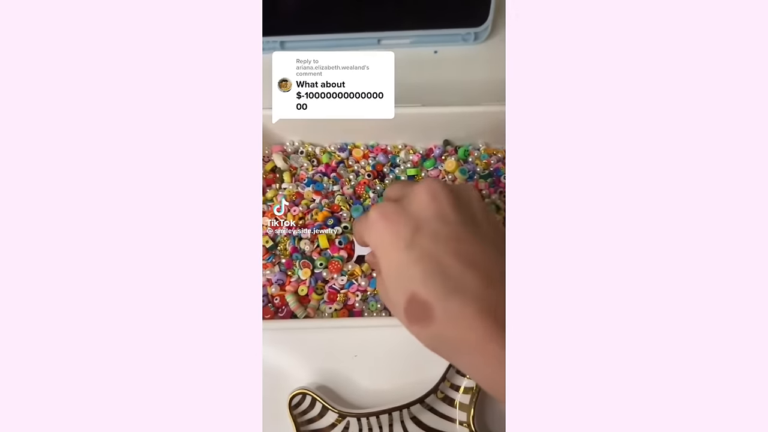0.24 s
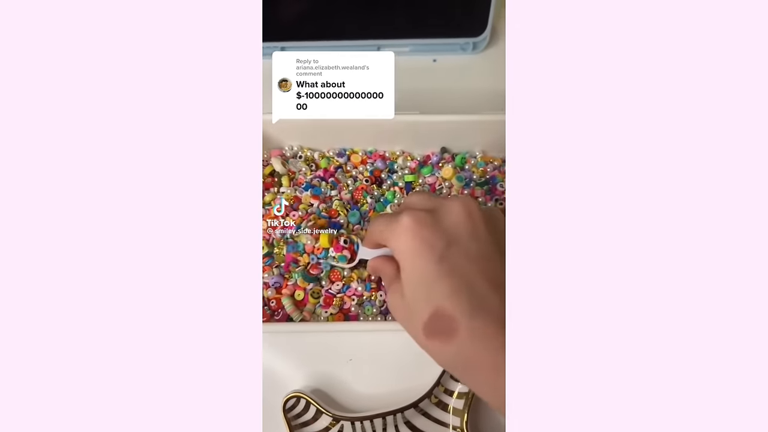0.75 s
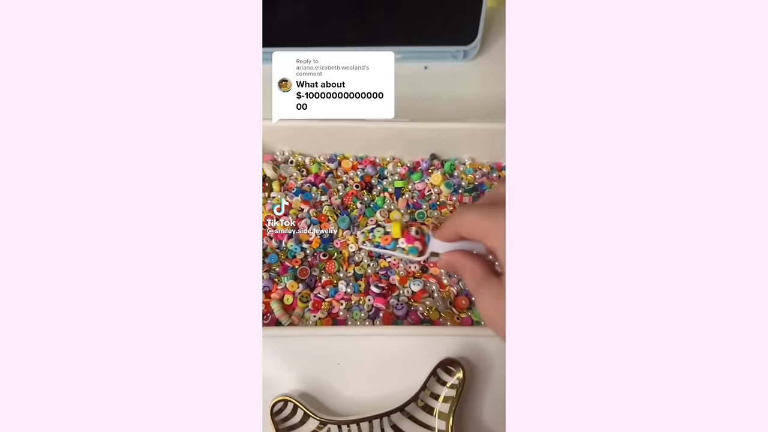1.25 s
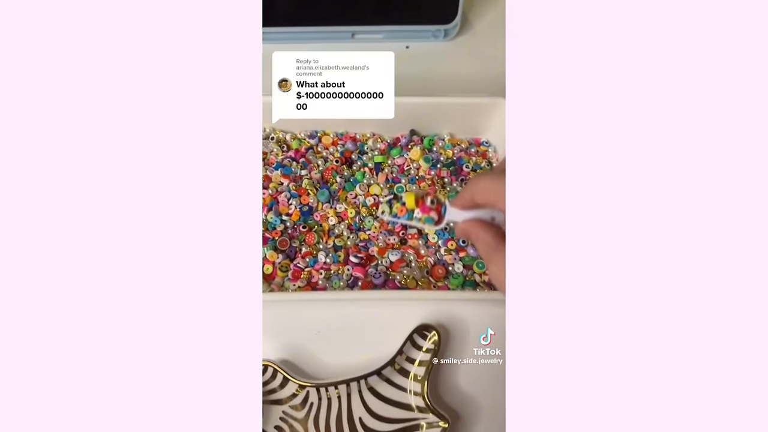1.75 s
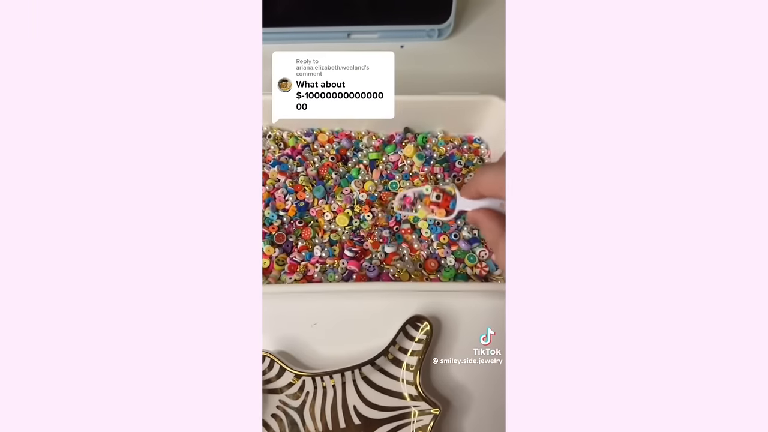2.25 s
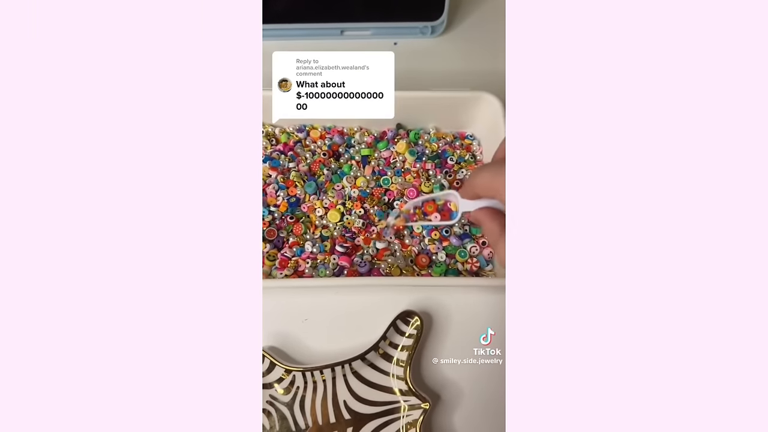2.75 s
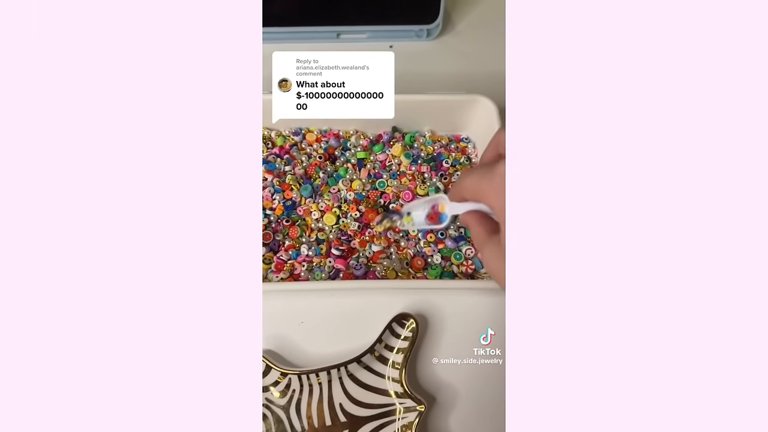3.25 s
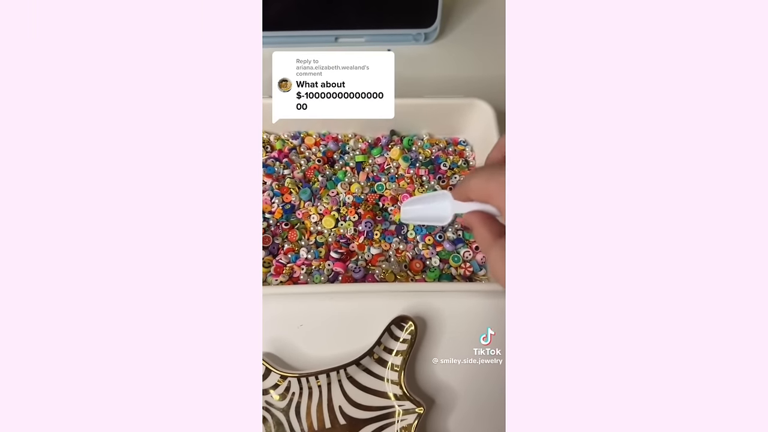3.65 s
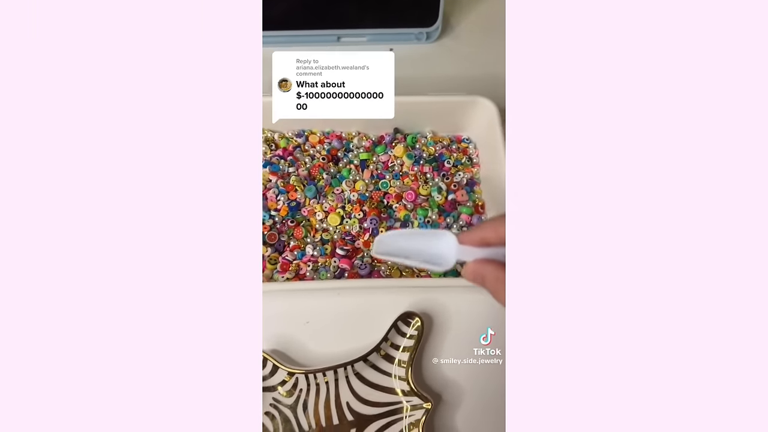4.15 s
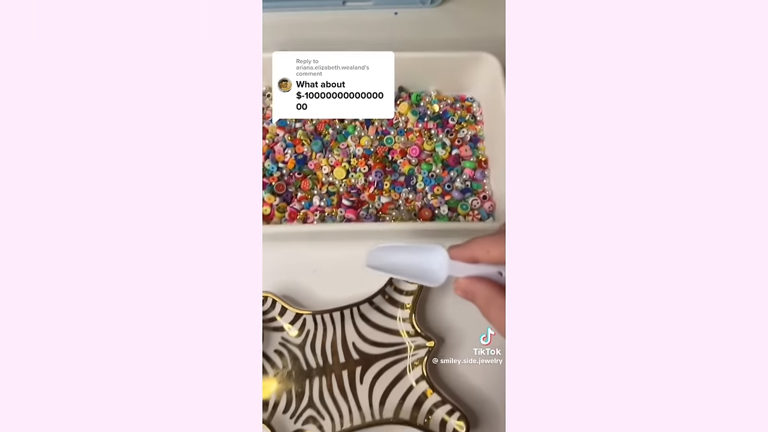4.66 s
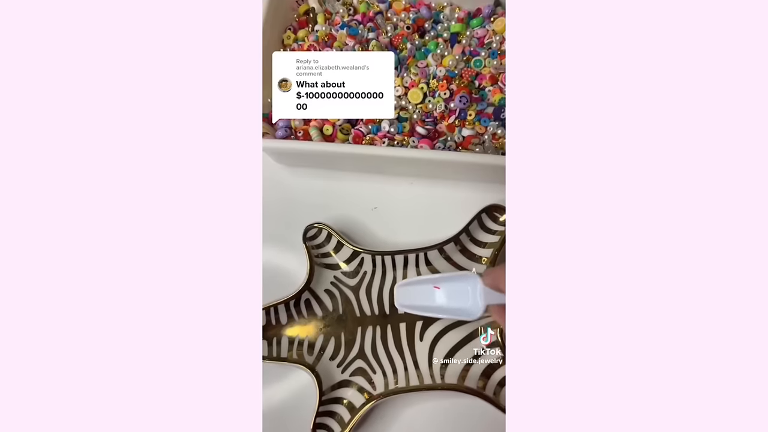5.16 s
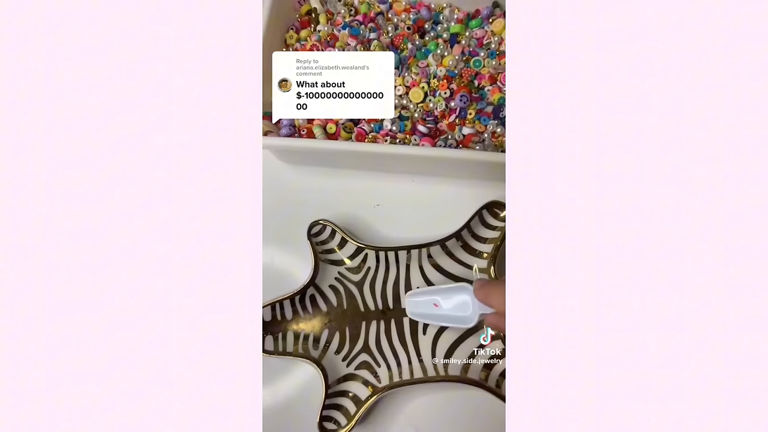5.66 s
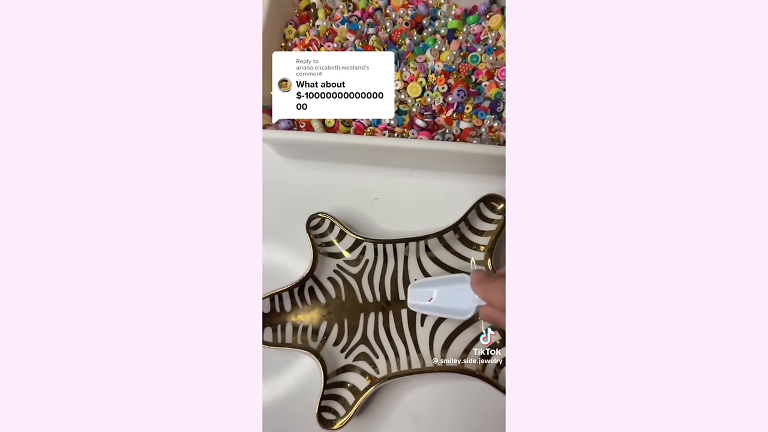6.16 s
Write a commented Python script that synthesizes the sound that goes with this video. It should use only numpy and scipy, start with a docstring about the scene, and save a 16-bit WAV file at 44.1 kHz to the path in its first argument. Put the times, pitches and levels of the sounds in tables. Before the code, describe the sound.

From the start, a small plastic scoop digs through a tray of clay beads, making a dense rustling rattle with sharp clicks on top. It thins out after about 1.2 seconds and briefly stops. From 1.7 seconds the beads are shaken in the scoop, clattering louder and peaking near 2.5 seconds. From about 2.9 to 3.6 seconds they spill back into the tray with bright ticks. A lull follows, holding only low ventilation rumble, faint hums and hiss, cut by an instant of dead silence at 5 seconds. The background returns quieter. At 5.6 and 6 seconds, two beads drop singly onto a glazed dish, the loudest sounds, each a sharp crack with a short high ring and a soft bump through the table. Everything is close to the microphone in a small room.

```python
"""Clay beads clatter as a small plastic scoop digs through a tray of them, is shaken and tipped out.
Each collision is a snap of noise coloured by clay and plastic; loud clicks ride on a dense rattle.
After a lull and an instant of dead silence, two beads drop on a glazed dish: a crack, a ring and
a bump on the table. All is close, in a small room with low ventilation rumble, faint tones and hiss."""
import sys
import numpy as np
from scipy import signal
from scipy.io import wavfile
from scipy.ndimage import uniform_filter1d

SR = 44100
rng = np.random.default_rng(int(sys.argv[2]) if len(sys.argv) > 2 else 0)


def materialize(psi):
    """Save the field psi as 16-bit PCM at rate SR to the path in sys.argv[1].

    A 1-D psi becomes a single channel; in a 2-D psi each row is a channel.
    """
    bounded = np.clip(np.atleast_2d(psi).T, -1, 1)
    quanta = np.round(bounded * 32767).astype(np.int16)
    wavfile.write(sys.argv[1], SR, quanta)


N = 282240

# the scoop's stirring gesture: time_s, level_db, brightness_db
STIRRING = [(0, -39.5, 0.5), (.1, -44, 0.5), (.28, -51.5, 0), (.32, -61, 4), (.39, -66, 0),
            (.43, -58.5, -1), (.5, -59.5, 1), (.55, -57, 3), (.74, -43, 2.5), (.92, -53, -0.5),
            (1.0, -67, -9), (1.25, -77, -5), (1.45, -98, -13), (1.7, -88, -12), (1.82, -63.5, 9),
            (1.95, -46.5, 9), (2.078, -43, -2), (2.22, -54.5, -0.5), (2.35, -63, 3), (2.47, -41, 4),
            (2.62, -45.5, -4), (2.72, -56.5, -3.5), (2.9, -60, -5), (3.04, -70.5, -3.5),
            (3.14, -48.5, -1.5), (3.228, -57, 0.5), (3.33, -48.5, -4), (3.47, -57.5, -6), (3.54, -70, -10),
            (3.65, -87, -6)]
STAGE_CHANGES_S = (1.55, 2.93)  # the scoop leaves the heap, then tips
SILENCE_START_S, SILENCE_END_S = 4.959, 5.1035


def gain_of(db):
    return 10 ** (np.asarray(db) / 20)


def unit_rms(x):
    return x / np.sqrt(np.mean(x ** 2) + 1e-20)


def curve_at(points, hz):
    """Interpolate (frequency, value) points on a log-frequency axis."""
    point_hz, value = np.transpose(points)
    return np.interp(np.log(hz + 1), np.log(point_hz + 1), value)


def add(mix, start_s, sound):
    part = mix[round(start_s * SR):][:len(sound)]
    part += sound[:len(part)]


def ring(modes, length):
    """A struck body: one dying sine for each (pitch_hz, level_db, t60_s)."""
    hz, db, t60 = np.transpose(modes)[:, :, None]
    t = np.arange(length) / SR
    return (gain_of(db - 60 * t / t60) * np.sin(2 * np.pi * hz * t)).sum(0)


def minimum_phase(gain):
    """Impulse response with this spectrum that rings after the blow, never before."""
    log_gain = np.log(gain + 1e-4)
    mirrored = np.r_[log_gain, log_gain[-2:0:-1]]
    return np.fft.ifft(np.exp(np.conj(signal.hilbert(mirrored)))).real


def drifting_noise(colour_db, patchy_db):
    """Coloured noise with patches of its spectrum swelling and fading."""
    real, imag, patches = rng.standard_normal((N // 1024 + 5, 2049, 3)).T
    patches = unit_rms(uniform_filter1d(uniform_filter1d(patches, 10, 0), 4, 1))
    spectra = (real + 1j * imag) * gain_of(colour_db[:, None] + patchy_db * patches)
    return unit_rms(signal.istft(spectra, nperseg=4096, noverlap=3072)[1][:N])


def room(x):
    """Reverb of a small room: sparse reflections whose treble dies first."""
    # decay of the room: freq_hz, t60_s
    decay = [(1000, 0.35), (3000, 0.13), (7000, 0.1), (13000, 0.12), (15500, 0.091)]
    taps = np.zeros(SR // 3)
    slots = np.arange(300, len(taps) - 20, 20)
    taps[slots + rng.integers(0, 20, len(slots))] = rng.choice([-1., 1.], len(slots))
    hz, t, spectra = signal.stft(taps, SR, nperseg=256)
    tail = signal.istft(spectra * gain_of(-60 * t / curve_at(decay, hz)[:, None]), SR, nperseg=256)[1]
    return signal.fftconvolve(x, tail / np.linalg.norm(tail))[:N]


def ventilation():
    """Rumbling air with soft hums: swells slightly at first, then quieter and thinner after the silent gap."""
    # spectrum of the air before and after the silent gap: freq_hz, level_db
    colour_before_gap = [(22, -31), (38, -2.5), (54, -0.5), (75, -16), (109, -0.5), (207, -11), (237, -20),
                         (306, -11), (357, -16.5), (394, -13.5), (548, -18), (679, -9.5), (1110, -18),
                         (2100, -30.5), (4000, -46.5), (5200, -74.5), (8800, -120)]
    colour_after_gap = [(22, -31), (38, -7.5), (107, -7.5), (164, -17), (219, -10.5), (247, -22), (409, -15.5),
                        (478, -25.5), (616, -12), (910, -16.5), (1290, -18), (2320, -31.5), (4000, -52),
                        (5200, -82.5), (8800, -120)]
    # hums of the room: pitch_hz, width_hz, boost_db
    hums = [(53.57, 20, 7.5), (100.8, 9.8, 6), (109.3, 2.2, 7.5), (146, 9.2, -1.5), (850, 15, 4),
            (1113, 11, 9.5)]
    hz, t = np.fft.rfftfreq(4096, 1 / SR), np.arange(N) / SR
    hums_db = sum(db / (1 + (2 * (hz - pitch) / width) ** 2) for pitch, width, db in hums)
    air_before_gap = drifting_noise(curve_at(colour_before_gap, hz) + hums_db, patchy_db=1.4)
    air_after_gap = drifting_noise(curve_at(colour_after_gap, hz) + hums_db, patchy_db=1.4)
    swell = gain_of(np.interp(t, (0, SILENCE_START_S), (-52, -50.5)))
    return np.where(t < SILENCE_START_S, swell * air_before_gap, gain_of(-58) * air_after_gap)


def faint_tones():
    """Thin low sines fade in and out during the lull."""
    # background tones: start_s, end_s, pitch_hz, level_db
    tones = [(3.55, 4.0, 318.5, -64), (4.199, 4.454, 401, -61.5), (4.32, 4.727, 306.4, -58.5),
             (4.743, 4.916, 105.2, -47.5)]
    out = np.zeros(N)
    for start, end, hz, db in tones:
        t = np.arange(0, end - start, 1 / SR)
        add(out, start, gain_of(db) * np.sin(2 * np.pi * hz * t) * signal.windows.tukey(len(t), .4))
    return out


def dish_drops():
    """Beads hit the dish. Returns the blows (crack and table bump) and the ring of the glaze."""
    # beads landing: start_s, crack_db, thud_db
    drops = [(5.6188, -9, -24.5), (6.0412, -7.5, -24)]
    # modes of the dish: pitch_hz, first_bead_db, second_bead_db, t60_s
    dish_modes = [(2290, -30, -29, .035), (2455, -55, -50, .2), (2833, -29, -22, .15),
                  (2835, -54, -44, .33), (2886, -50, -46, .12), (3171, -62, -56, .2),
                  (3635, -35, -40, .025), (3640, -52, -58, .12), (4323, -51, -45, .1),
                  (4484, -26.5, -25.5, .13), (4486, -48, -46, .32), (4665, -46, -46, .07),
                  (6227, -41, -44, .1), (6515, -42, -46, .04), (6750, -60, -52, .15), (8090, -60, -50, .12),
                  (8866, -56, -62, .12), (10700, -60, -56, .12), (12150, -60, -52, .14),
                  (12352, -51, -48, .167), (12790, -56, -57, .19), (13030, -56, -51, .17),
                  (13155, -36, -34, .15), (13225, -46, -43, .12), (13540, -47, -49, .11),
                  (14100, -48, -50, .16)]
    # spectrum of clay striking glaze: freq_hz, level_db
    crack_colour = [(470, -49), (800, -14.5), (1400, -18), (2000, -15.5), (2350, 5), (3500, 1.5),
                    (4770, -4), (5620, -15), (6300, -4.5), (6890, 3.5), (8430, -0.5), (9690, -16),
                    (10500, -6.5), (13100, 1), (15500, -18), (16500, -35.5)]
    # modes of the table under the dish: pitch_hz, level_db, t60_s
    table_modes = [(325, -6, .045), (385, -.5, .055), (480, -2.5, .045), (580, -7, .03)]
    hz, t = np.fft.rfftfreq(512, 1 / SR), np.arange(512) / SR
    crack_body = minimum_phase(gain_of(curve_at(crack_colour, hz)))
    soft_attack = 1 - np.exp(-(np.arange(6000) / SR / 0.0087) ** 2)  # the table answers a little late
    thud = ring(table_modes, 6000) * soft_attack
    blows, glaze = np.zeros(N), np.zeros(N)
    for bead, (start, crack_db, thud_db) in enumerate(drops):
        modes = [(pitch, levels_db[bead], t60) for pitch, *levels_db, t60 in dish_modes]
        add(glaze, start, ring(modes, 16000))
        chatter = gain_of(-17.5) * rng.standard_normal(512) * gain_of(-60 * t / 0.022)
        chatter[12] += 1  # one hard contact
        crack = signal.fftconvolve(chatter, crack_body)
        add(blows, start, gain_of(crack_db) * crack / abs(crack).max())
        add(blows, start, gain_of(thud_db) * thud)
    return blows, glaze


def stirring_db(times_s):
    """Knock, clack and tick levels of the rattle; brightness lifts the ticks and lowers the knocks."""
    at, level_db, brightness_db = np.transpose(STIRRING)
    tilt_db = np.outer((-0.37, 0, .9), np.interp(times_s, at, brightness_db))
    balance_db = np.c_[[-6, -1.5, -3]]
    return np.interp(times_s, at, level_db) + tilt_db + balance_db


def collision(stage, band):
    """One bead contact in one band (knock, clack or tick): a dry snap through clay and plastic."""
    # spectra of beads packed in the tray, shaken in the scoop and tipped back: freq_hz, level_db
    heap = [(530, -29), (900, -16.5), (1340, -2.5), (1750, -12), (2070, -4), (2570, -1), (2830, -10),
            (3110, -3.5), (3430, -7), (5100, -3), (5890, -8.5), (8980, 0), (10200, -4), (13500, 5.5),
            (16000, -5)]
    scoop = [(530, -41), (900, -15.5), (1170, -9.5), (1420, -14.5), (1700, -5.5), (2140, -11.5), (2360, -3),
             (2690, -2), (3300, -9.5), (7060, -20), (8660, -11.5), (10100, -19), (12900, -6), (15400, -14),
             (16000, -25)]
    spill = [(530, -47.5), (900, -16), (1170, -10), (2120, -13.5), (2690, -8.5), (3230, -16.5),
             (4740, -9.5), (5820, -18), (6560, -7), (7310, -18), (8660, -4), (9770, -16.5), (12300, -4.5),
             (15400, -12.5), (16000, -22.5)]
    # plastic and clay resonances, weighted anew at each contact: pitch_hz, boost_db, half_width_hz
    resonances = [(1210, 2.5, 240), (1260, -1, 120), (1902, 5, 84), (2430, 5, 33), (2730, 4, 180),
                  (3150, 2.5, 99), (3770, 4, 130), (4640, 1.5, 750), (6930, 4.5, 160), (7800, 6, 170),
                  (9040, 4, 130), (10650, 6.5, 110), (12500, -2.5, 90), (12800, 5.5, 200)]
    ringing = (0.67, 0.94, 1.6)[stage]  # how freely the beads ring in heap, scoop and spill
    low_hz, high_hz = ((600, 4000), (4000, 10000), (10000, 17000))[band]
    hz, t = np.fft.rfftfreq(1024, 1 / SR), np.arange(1024) / SR
    weights = ringing * (1 + .5 * rng.standard_normal(len(resonances)))
    peaks_db = sum(weight * db / (1 + ((hz - pitch) / width) ** 2)
                   for weight, (pitch, db, width) in zip(weights, resonances))
    passband = 1 / (1 + (low_hz / (hz + 1)) ** 12) / (1 + (hz / high_hz) ** 12)
    body = minimum_phase(gain_of(curve_at((heap, scoop, spill)[stage], hz) + peaks_db) * passband)
    snap_t60 = (.008, .006, .005)[band] * gain_of(1.5 * rng.standard_normal())
    settling = gain_of((-13.5, -12.5, -20.5)[band] - 60 * t / 0.11)  # neighbours shift after the blow
    envelope = (gain_of(-60 * t / snap_t60) + settling) * (1 - np.exp(-t / 0.00013))
    snap = rng.standard_normal(1024) * envelope
    snap[6] += gain_of(8.5) * rng.choice([-1, 1])  # the hard first touch
    sound = signal.fftconvolve(snap, body)[:1024] * gain_of(-60 * t / 0.16)
    return sound / np.sqrt(uniform_filter1d(sound ** 2, size=66).max())  # loudest 1.5 ms at unit level


def bead_rattle(per_s=1400, spread_db=2.5, clump_s=.02, clump_db=2.5, variants=9):
    """A bed of small random collisions that come in clumps, each sounding in all three bands."""
    hits = gain_of(spread_db * np.minimum(rng.exponential(1, N), 4))
    hits *= rng.random(N) < per_s / SR
    clumps = unit_rms(uniform_filter1d(rng.standard_normal(N), round(clump_s * SR)))
    hits = unit_rms(hits * gain_of(clump_db * clumps))
    out, t = np.zeros(N), np.arange(N) / SR
    grain_index = rng.integers(0, variants, N) + variants * np.searchsorted(STAGE_CHANGES_S, t)
    for band, level in enumerate(gain_of(stirring_db(t))):
        train = hits * level
        for k in range(3 * variants):
            grain = collision(stage=k // variants, band=band)
            out += signal.oaconvolve(train * (grain_index == k), grain / np.linalg.norm(grain))[:N]
    return out


def bead_clicks(strays_per_s=85, stray_lift_db=4, stray_spread_db=4):
    """Hard collisions that jump out of the rattle, plus random strays a little above it."""
    # the loudest collisions: start_s, knock_db, clack_db, tick_db
    accents = [(.0068, -41, -47, -37), (.0589, -52, -46, -26.5), (.124, -48, -37, -33),
               (.1543, -52, -39, -37), (.2451, -59, -44, -36), (.288, -70, -42, -45),
               (.401, -50, -38.5, -48), (.4397, -56, -43, -40), (.536, -60, -38, -50),
               (.6002, -60, -37.5, -44), (.6623, -65, -35, -46), (.6867, -48, -32, -50),
               (.7333, -58, -32, -47), (.7786, -53.5, -29.5, -48), (.8004, -31, -30.5, -48),
               (.8363, -37, -31, -55), (.8492, -38.5, -33, -50), (.858, -52, -46, -42),
               (.867, -54, -55, -42), (.8833, -60, -50, -40), (.899, -60, -54, -40),
               (.907, -46, -37.5, -33.5), (.9224, -63, -56, -39), (.9377, -62, -56, -35),
               (.9456, -50, -47, -47), (.9548, -60, -45, -30), (.9603, -64, -53, -37),
               (.9645, -64, -48, -40), (.9694, -70, -53, -35), (.9865, -57, -45, -27),
               (1.008, -56, -55, -44), (1.0156, -50, -46, -32.5), (1.0678, -64, -53, -39),
               (1.0897, -57, -44, -33.5), (1.1262, -49, -40, -29), (1.1451, -57, -53, -41),
               (1.1822, -55.5, -55, -70), (1.2335, -52.5, -58, -55), (1.2432, -54, -58, -63),
               (1.2599, -49.5, -52.5, -70), (1.3666, -56, -61, -67), (1.399, -64, -60, -64),
               (1.7363, -65, -51, -53), (1.7702, -70, -58, -52), (1.7792, -59, -49, -40),
               (1.7903, -55, -50, -51), (1.7987, -54, -47, -42), (1.818, -58, -47, -35),
               (1.8328, -50, -38.5, -39), (1.8786, -43, -33, -38), (1.902, -59, -50, -37),
               (1.9086, -64, -52, -31.5), (1.9457, -40, -54, -42), (1.9664, -57.5, -53, -24.5),
               (1.9713, -35, -45.5, -51), (2.014, -33, -40, -30), (2.0331, -34, -35, -42),
               (2.0666, -24.5, -28, -30), (2.0879, -32, -38, -36), (2.1, -30, -29, -27),
               (2.1399, -49, -53, -28), (2.1625, -50, -46, -48), (2.176, -27.5, -35, -38),
               (2.2067, -36.5, -38, -46), (2.2513, -42, -40.5, -39), (2.2772, -49, -56, -42),
               (2.2954, -63.5, -53.5, -26), (2.3119, -40.5, -37.5, -37), (2.3323, -50, -55.5, -42),
               (2.3941, -59.5, -54, -32.5), (2.41, -68.5, -59, -30), (2.431, -28.5, -33, -36),
               (2.4382, -54, -31.5, -32), (2.452, -45, -50, -35), (2.4675, -19, -22.5, -23.5),
               (2.495, -33, -30, -44), (2.5022, -24, -29, -36), (2.511, -30, -32, -32),
               (2.527, -44, -43, -28), (2.5806, -35.5, -46, -32), (2.6057, -29.5, -33, -24.5),
               (2.647, -26, -28, -27), (2.7042, -62, -40, -35), (2.7235, -39.5, -43, -43),
               (2.7545, -55, -48, -37), (2.76, -39, -36, -46), (2.7711, -36, -35, -26),
               (2.815, -35, -38.5, -48), (2.8535, -41, -40, -53), (2.9213, -51, -46, -43),
               (2.947, -40.5, -42.5, -32), (2.9577, -46.5, -52, -36), (2.9701, -68.5, -42, -38),
               (2.9903, -65, -40, -32.5), (3.0301, -46, -46.5, -50), (3.0803, -61.5, -46.5, -41),
               (3.1043, -65, -36, -24.5), (3.12, -46.5, -37.5, -26), (3.124, -53, -40, -25),
               (3.131, -49.5, -42, -32), (3.1415, -42, -33, -24), (3.1566, -41, -34, -35),
               (3.187, -57.5, -42.5, -42), (3.2364, -35, -39, -39), (3.255, -50.5, -46, -42.5),
               (3.2642, -39.5, -29, -15.5), (3.2742, -43.5, -29, -36), (3.2842, -37, -36.5, -29),
               (3.3094, -56, -40.5, -42), (3.327, -39, -34, -22), (3.3363, -30.5, -29.5, -42),
               (3.3677, -52, -26.5, -26), (3.3991, -51, -54, -49), (3.4075, -36.5, -31, -31),
               (3.4155, -39, -33.5, -32), (3.4453, -34, -41, -40), (3.4845, -61, -51, -58),
               (3.5719, -46, -51, -59)]
    slots_s = (np.arange(round(strays_per_s * STIRRING[-1][0])) + .5) / strays_per_s
    jitter = rng.standard_normal((len(slots_s), 4))
    strays_s = abs(slots_s + jitter[:, 0] / strays_per_s)
    strays_db = stirring_db(strays_s).T + stray_lift_db + stray_spread_db * jitter[:, 1:]
    out = np.zeros(N)
    for start, *bands_db in [*accents, *np.c_[strays_s, strays_db]]:
        stage = np.searchsorted(STAGE_CHANGES_S, start)
        add(out, start, sum(gain_of(db) * collision(stage, band) for band, db in enumerate(bands_db)))
    return out


def scene():
    """Scooped beads and dish drops, close up with a touch of room, over the background; mono."""
    beads = bead_clicks() + bead_rattle()
    dulled = signal.lfilter(*signal.butter(1, 4500, fs=SR), beads)
    beads += 0.26 * np.roll(dulled, round(0.0034 * SR))  # echo off the tray wall
    blows, glaze = dish_drops()
    room_send = blows + gain_of(-5.5) * glaze  # the room echoes mostly the crack; the ring stays drier
    drops = blows + glaze + gain_of(-15) * room(room_send)
    return (beads + gain_of(-14) * room(beads) + drops + ventilation() + faint_tones())[None]


def record(dry):
    """Add microphone hiss, roll off the bass, mute the silent gap and shelve down the top treble."""
    # spectrum of the microphone hiss: freq_hz, level_db
    hiss_colour = [(1470, -30.5), (2500, -5.5), (3260, -3.5), (3880, -2.5), (4450, -4.5), (8670, -4.5),
                   (10500, -11.5), (13300, -8), (15300, -10.5)]
    shelf_hz, shelf_db, cutoff_hz = 15600, -25, 16600
    t = np.arange(N) / SR
    hiss = drifting_noise(curve_at(hiss_colour, np.fft.rfftfreq(4096, 1 / SR)), patchy_db=2.5)
    hiss *= gain_of(np.where(t < SILENCE_START_S, -73, -76.5))
    heard = signal.sosfilt(signal.butter(4, 38, "highpass", fs=SR, output="sos"), dry + hiss)
    heard *= (t < SILENCE_START_S) | (t > SILENCE_END_S)
    below, whole = (signal.firwin(511, hz, window=("kaiser", 9), fs=SR) for hz in (shelf_hz, cutoff_hz))
    shelf = below + gain_of(shelf_db) * (whole - below)
    return signal.oaconvolve(heard, shelf[None], "same")


dry = scene()
out = record(dry)
materialize(out)
```